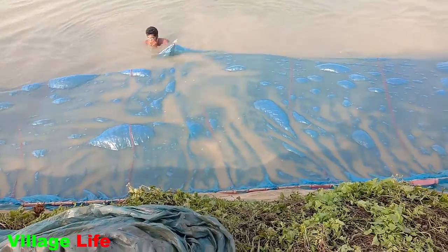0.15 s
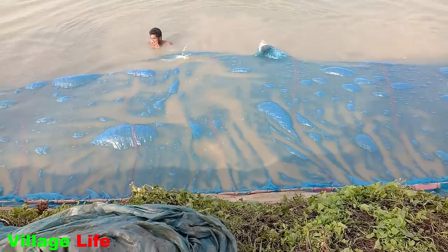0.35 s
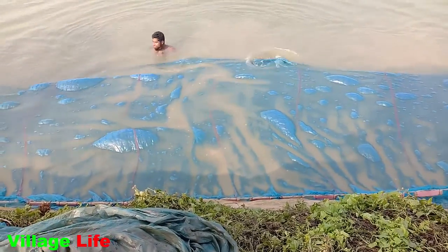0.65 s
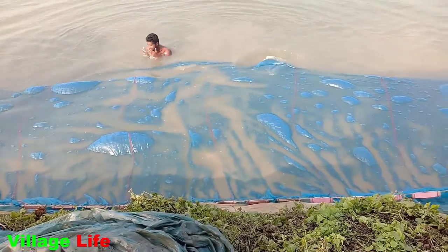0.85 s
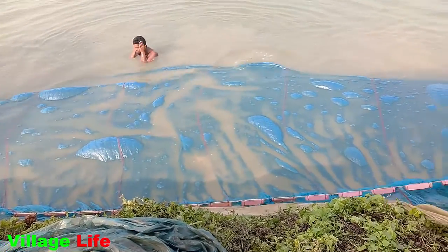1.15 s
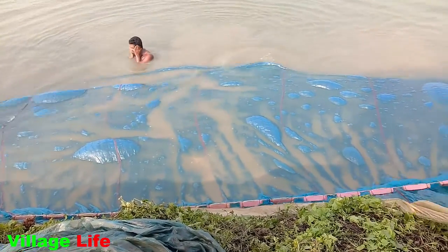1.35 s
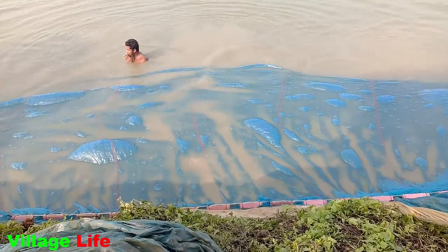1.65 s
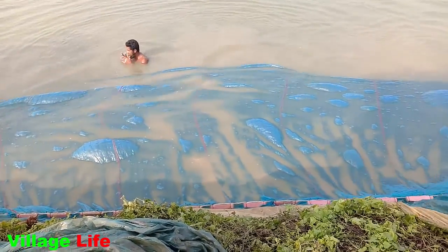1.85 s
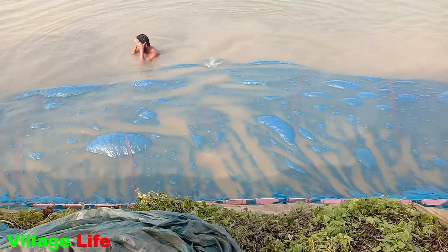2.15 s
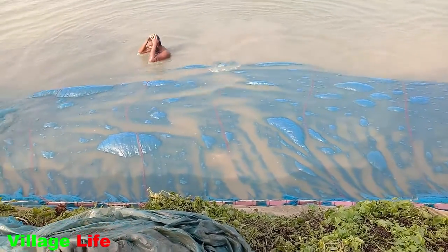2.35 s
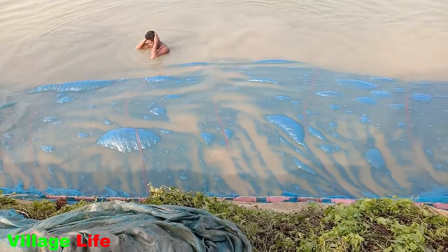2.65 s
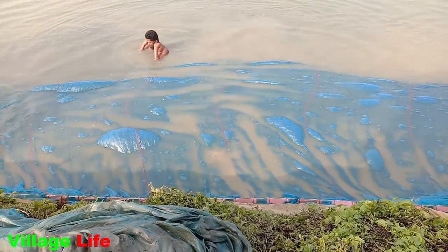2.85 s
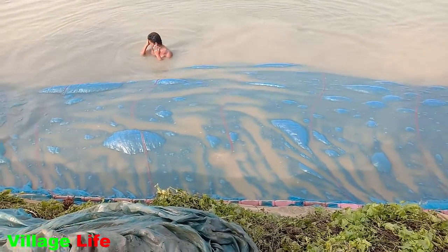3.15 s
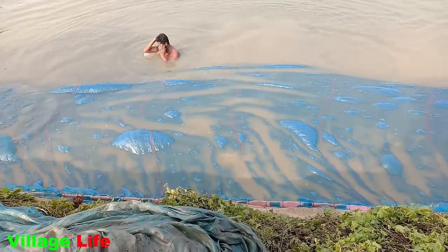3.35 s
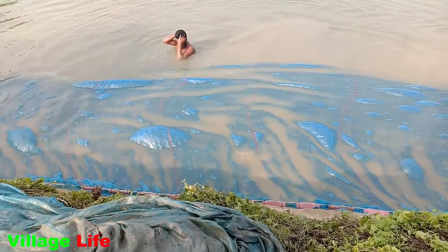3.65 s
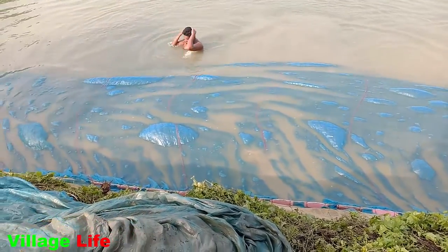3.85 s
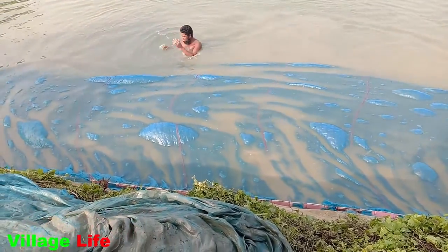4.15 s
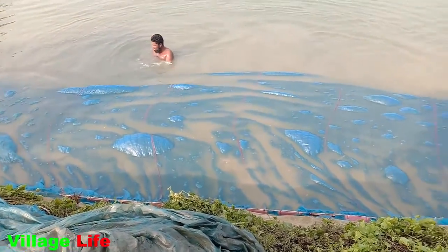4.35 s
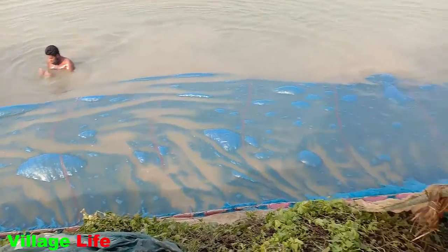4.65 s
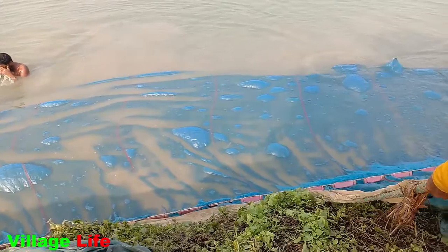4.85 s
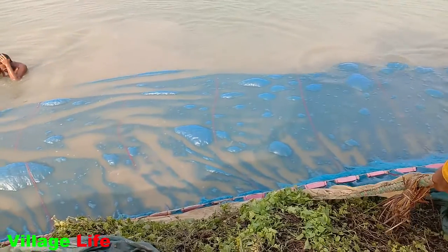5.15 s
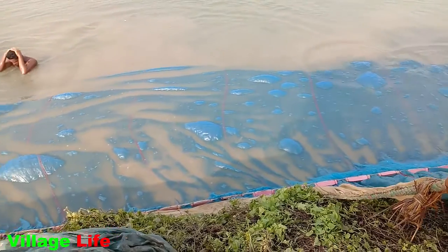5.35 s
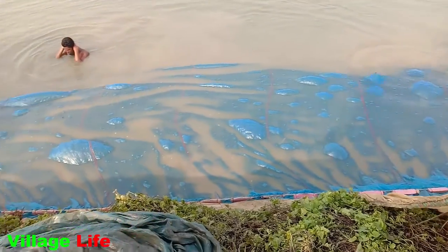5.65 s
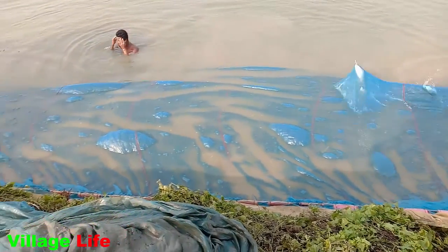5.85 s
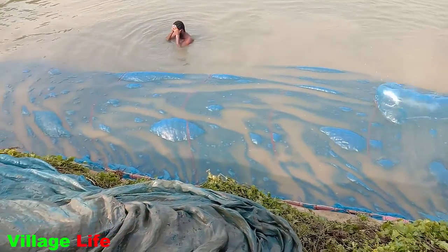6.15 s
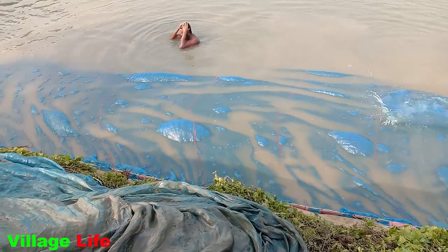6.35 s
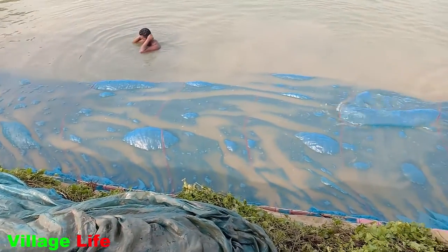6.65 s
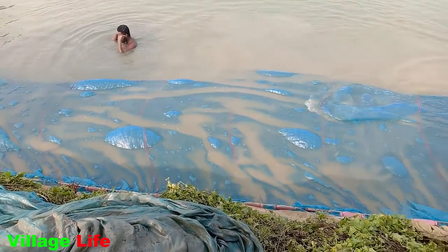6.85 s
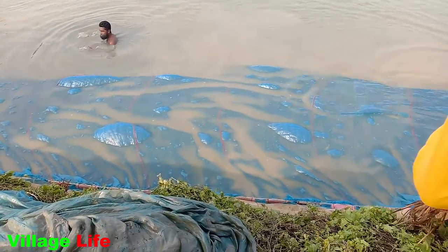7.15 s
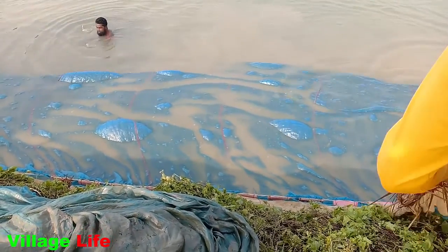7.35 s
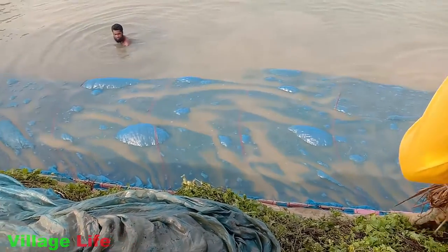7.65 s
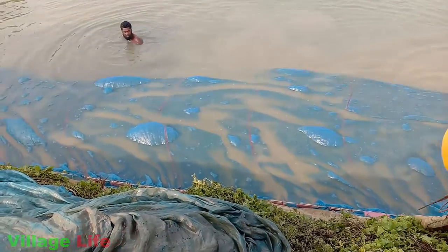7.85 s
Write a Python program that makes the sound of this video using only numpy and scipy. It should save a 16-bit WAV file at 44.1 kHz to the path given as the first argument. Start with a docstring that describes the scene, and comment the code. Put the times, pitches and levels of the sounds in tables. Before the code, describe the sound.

A wide net is drawn through muddy pond water. It begins quietly with light trickling and small bubbles, then a sharp fish splash cracks with hollow plops. Fuller surges of fizzy spray and low slosh swell and fade in succession, with more slaps and gurgles later. Faint breeze thumps and a distant low hum sit underneath. Outdoors, nearly mono, through a small microphone with a hollow midrange.

```python
"""Fishing net drawn through a pond

A wide net moves through muddy water: surges of spray are shaped noise plus swarms of damped-sine bubbles.
Fish flap in short noise bursts; air pockets plop and gurgle as damped sines with climbing pitch.
A breathy hiss, a light breeze and a far hum are coloured noise with slow or gusting gains.
A small microphone with a hollow mid resonance feeds both channels; only a faint low murmur differs.
"""
import sys
import numpy as np
from scipy import signal
from scipy.fft import rfft, irfft, next_fast_len
from scipy.io import wavfile
from scipy.ndimage import uniform_filter1d, map_coordinates

SR = 44100
rng = np.random.default_rng(int(sys.argv[2]) if len(sys.argv) > 2 else 0)


def int16_out(signal):
    """Quantize to a 16-bit WAV file."""
    q = np.round(np.clip(np.atleast_2d(signal).T, -1, 1) * 32767)
    wavfile.write(sys.argv[1], SR, q.astype(np.int16))


N = 352711


def amp(db):
    """Gain of a level in dB."""
    return 10 ** (np.asarray(db) / 20)


def unit(x):
    """x at rms 1."""
    return x / np.sqrt(np.mean(x ** 2) + 1e-20)


def wobble(rate_hz):
    """Smooth random curve, rate_hz knots a second."""
    knots = rng.standard_normal(int(N * rate_hz / SR) + 4)
    return map_coordinates(knots, [np.arange(N) * rate_hz / SR])


def filtered(x, response):
    """x times a response given as a function of frequency in Hz."""
    size = next_fast_len(N + SR // 2)
    f_hz = np.fft.rfftfreq(size, 1 / SR)
    return irfft(rfft(x, size) * response(f_hz), size)[..., :N]


def coloured(x, spectrum):
    """x through (Hz, dB) points on a log axis, closed at both ends, at rms 1."""
    f_hz, db = np.transpose(spectrum)

    def response(hz):
        return amp(np.interp(np.log(hz + 1), np.log(f_hz), db, -120, -120))

    return unit(filtered(x, response))


def noise(spectrum):
    """Steady Gaussian noise of the given spectrum, at rms 1."""
    return coloured(rng.standard_normal(N), spectrum)


def patter(spread_db, grain_s, patchy_db):
    """Countless drops: white noise with grain-by-grain random gain, patchy in time and frequency."""
    z = signal.stft(rng.standard_normal(N), nperseg=512)[2]
    field = uniform_filter1d(rng.standard_normal(z.shape), 6, axis=0)
    field = uniform_filter1d(field, 8, axis=1)
    hiss = signal.istft(z * amp(patchy_db * unit(field)), nperseg=512)[1][:N]
    grain = np.arange(N) / SR / grain_s
    size = np.interp(grain, np.arange(N), rng.standard_normal(N))
    return hiss * amp(spread_db * size)


def bubbles(start_s, db, hz, cycles, climb, size):
    """Damped sines, soft start; pitch climbs over two lives as each bubble nears the surface."""
    t = np.arange(size) / SR
    age = t * (hz / np.clip(cycles, .5, 40))[:, None]  # in lives; a life is a fall of 20 dB
    turns = hz[:, None] * t * (1 + climb[:, None] / 2 * np.minimum(age, 2))
    shape = amp(-20 * age) * (1 - np.exp(-hz[:, None] * t / 0.53))
    shape = shape / shape.max(axis=1, keepdims=True)
    tones = amp(db)[:, None] * shape * np.sin(2 * np.pi * turns)
    at = np.round(start_s * SR).astype(int)[:, None] + np.arange(size)
    return np.bincount(at.ravel(), tones.ravel(), N + size)[:N]


def swarm(hz, octaves, cycles, spread_db, count, size):
    """Bubbles at random times, with random pitch and level, at rms 1."""
    start_s = rng.random(count) * (N - 1) / SR
    pitch, level = rng.standard_normal((count, 2)).T
    pitch_hz = hz * 2 ** (octaves * pitch)
    lives, climb = np.full(count, cycles), np.full(count, .15)
    return unit(bubbles(start_s, spread_db * level, pitch_hz, lives, climb, size=size))


HOP = 64  # samples per step of the hump gains
EDGE_DROP_DB = 12  # drop below peak power one rise before and one fall after


def swells(peak_s, rise_s, fall_s, square):
    """One smooth hump of power per event, peak 1, a row each."""
    late_s = np.arange(0, N + HOP, HOP) / SR - peak_s[:, None]
    width_s = np.where(late_s < 0, rise_s[:, None], fall_s[:, None])
    return amp(-2 * EDGE_DROP_DB * np.abs(late_s / width_s) ** square)


def summed(db, humps, rest_db):
    """Gain per sample of humps over a steady rest; powers add."""
    power = amp(2 * db) @ humps + amp(2 * rest_db)
    return np.sqrt(np.interp(np.arange(N) / HOP, np.arange(len(power)), power))


# low murmur, opposite in the two channels: f/Hz, density/dB
MURMUR_BAND = [(20, 6), (100, -1), (300, -3), (700, -6), (1000, -19)]
MURMUR_DB = -86.5


def murmur():
    """Faint low noise, slowly unsteady in level."""
    return amp(MURMUR_DB + 1.7 * wobble(15)) * noise(MURMUR_BAND)


# distant countryside hum: f/Hz, density/dB
HUM_BAND = [(12, -41), (20, 3), (103, 15), (143, 20), (247, -14), (490, 7), (700, -17), (910, -28),
            (1540, -120)]
HUM_DB = -83


def far_hum():
    """Steady low noise from far off."""
    return amp(HUM_DB) * noise(HUM_BAND)


# gusts thudding on the microphone: t/s, level/dB, rise and fall/s
GUSTS = [(0.12, -53, 0.028), (0.38, -55, 0.055), (0.79, -56, .03), (0.88, -51, 0.017), (1.02, -54, 0.018),
         (1.35, -59, 0.04), (2.2, -58, .04), (2.49, -56, 0.036), (2.94, -53, 0.076), (4.34, -55, 0.044),
         (4.9, -54.5, 0.024), (5.04, -58, 0.033), (5.5, -50.5, 0.089), (5.99, -46.5, 0.035),
         (6.15, -54, .05), (6.32, -54.5, .03), (6.54, -53, 0.032), (6.95, -58, 0.11), (7.19, -57, 0.028),
         (7.67, -59, 0.028)]
# buffeting of air: f/Hz, density/dB
PUFF_BAND = [(20, -13), (45, -11), (65, -2.5), (100, 0), (150, -1), (260, -26)]
BREEZE_DB = -63.5  # between gusts, median
GUST_SQUARE = 2.2  # 2 = bell, more = flat top


def breeze():
    """Low turbulent noise at the microphone: lumpy light air plus single gusts."""
    peak_s, db, half_s = np.transpose(GUSTS)
    gusts = summed(db, swells(peak_s, half_s, half_s, GUST_SQUARE), -120)
    light_air = amp(BREEZE_DB) * amp(3.2 * wobble(12))
    return (gusts + light_air) * noise(PUFF_BAND)


# course of the breathy hiss: t/s, level/dB
WHISPER = [(0.0, -60), (0.09, -66), (0.82, -62.5), (1.31, -64), (1.51, -52.5), (1.76, -54.5), (3.54, -52.5),
           (3.78, -57), (4.32, -48), (4.88, -48.5), (5.14, -60.5), (5.41, -64), (5.59, -57.5),
           (6.39, -52.5), (7.42, -50), (7.57, -60), (7.77, -58.5), (8.0, -53.5)]
# its narrow band: f/Hz, density/dB
WHISPER_BAND = [(950, -15), (1130, -6.5), (1250, 2), (1370, -6.5), (1600, -5)]


def whisper():
    """Narrow noise, gently unsteady, that lasts through the lulls."""
    t_s, db = np.transpose(WHISPER)
    course_db = np.interp(np.arange(N) / SR, t_s, db)
    flicker_db = 2.2 * wobble(30) + 1.3 * wobble(7)
    return amp(course_db + flicker_db) * noise(WHISPER_BAND)


# drops snapping on the taut mesh: t/s, peak level/dB
TICKS = [(1.172, -31), (1.192, -24), (4.8064, -41), (5.2444, -39.5), (6.9614, -29), (7.5774, -31)]


def snaps():
    """Mesh under a drop: a short damped sine of fixed pitch."""
    start_s, db = np.transpose(TICKS)
    one = np.ones(len(start_s))
    return bubbles(start_s, db, hz=5600 * one, cycles=8.2 * one, climb=0 * one, size=300)


# single bubbles, small plops to large air pockets closing: t/s, peak level/dB, f/Hz, life/cycles
PLOPS = [(0.296, -39.5, 970, 7), (0.349, -54, 133, 5.1), (0.407, -42.5, 750, 14), (0.42, -46, 440, 8.7),
         (0.424, -45, 760, 7.6), (0.539, -46, 794, 8), (0.579, -40, 2140, 8.7), (0.605, -37, 1095, 11),
         (0.615, -46, 1230, 16), (0.657, -43, 940, 9.8), (0.672, -47, 524, 7.8), (0.798, -36, 1590, 8.7),
         (0.875, -37, 96, 2), (0.972, -50, 540, 6), (0.988, -48, 350, 5.1), (1.013, -44, 355, 6.7),
         (1.194, -28, 1540, 6.8), (1.195, -29, 2790, 7.3), (1.314, -41, 1240, 8), (1.315, -42, 800, 6.6),
         (1.357, -38, 493, 7.3), (1.36, -25.5, 1200, 7.3), (1.368, -22, 1960, 12), (1.376, -19, 1910, 10),
         (1.381, -18, 1130, 2.5), (1.386, -29.5, 705, 4.4), (1.392, -22, 1010, 13), (1.4, -14, 1830, 4.6),
         (1.429, -41, 300, 5.2), (1.448, -41, 380, 6.6), (1.488, -45, 376, 6), (1.596, -36.5, 1240, 8),
         (1.689, -30.5, 1220, 11), (1.69, -28, 290, 2.8), (1.891, -35, 1225, 29), (2.888, -43, 387, 11),
         (3.33, -40, 490, 8.5), (3.723, -33, 960, 9.9), (4.268, -25.5, 1170, 5.9), (4.277, -23, 2200, 8.7),
         (4.359, -36, 390, 5.3), (4.392, -28.5, 360, 13.5), (4.394, -26, 1170, 3.9),
         (4.428, -31.5, 377, 6.7), (4.431, -25, 1420, 27), (4.457, -37, 222, 5.2), (4.81, -32.5, 1370, 8),
         (5.226, -41, 1640, 9), (5.246, -37, 1890, 7.8), (5.76, -24, 932, 15), (5.779, -32, 875, 8.2),
         (5.795, -36, 810, 8), (5.808, -36, 840, 11), (5.982, -32.5, 250, 3.5), (6.097, -36, 800, 8),
         (6.125, -33.5, 322, 3.2), (6.157, -38.5, 2200, 8), (6.234, -29.5, 1230, 10),
         (6.238, -33, 2600, 12), (6.856, -33, 253, 10), (6.908, -38, 320, 4.5), (6.935, -40, 420, 6),
         (6.889, -37, 575, 6.9), (6.956, -27, 337, 3.7), (6.962, -15.5, 1190, 4.2), (6.968, -36.5, 170, 4),
         (6.984, -32, 465, 4.7), (7.01, -35, 468, 6), (7.022, -43, 165, 3.9), (7.03, -38, 397, 8.8),
         (7.049, -35, 350, 15), (7.09, -39.5, 390, 10), (7.149, -37, 290, 4.1), (7.172, -38, 190, 3.5),
         (7.285, -44, 198, 2.9), (7.291, -42, 482, 4.7)]
PLOP_CLIMB = 0.077  # fraction of pitch per life


def plops():
    """Bubbles and air pockets standing out alone, each ringing at its own pitch."""
    start_s, db, hz, cycles = np.transpose(PLOPS)
    return bubbles(start_s, db, hz, cycles, np.full(len(PLOPS), PLOP_CLIMB), size=5000)


# water surging off the mesh: peak t/s, fizz level/dB, rise/s, fall/s, squareness (2 = bell, more = flat top),
# coarse drops/dB over fizz, brightness/dB, slosh level/dB, deep slosh level/dB
SURGES = [(0.18, -48, .11, .05, 2.4, -15, 2, -83, -73), (0.41, -54, 0.16, 0.46, 2.4, -7.5, 5, -72, -72),
          (0.51, -44, 0.028, .04, 2.4, -11, 2, -60, -69), (0.8, -42, .24, 0.24, 2.2, -11.5, 5.5, -58, -68),
          (0.93, -39.5, .048, 0.35, 2.3, -16.5, 3, -60.5, -67),
          (1.32, -45.5, 0.025, 0.34, 3.4, -4, -3, -60, -70),
          (1.53, -44, .036, 0.34, 2.4, -10.5, -3, -72, -66),
          (1.83, -43.5, 0.048, .48, 2.7, -16, -6, -78, -73),
          (2.11, -32.5, .11, .2, 2, -14.5, 0, -53.5, -57),
          (2.56, -27, .17, 0.18, 3.2, -18.5, 2, -51.5, -55),
          (2.98, -30.5, 0.19, 0.24, 2.07, -16, -0.5, -49, -57),
          (3.32, -40, 0.072, 0.16, 2.8, -8.5, 1.5, -51, -57),
          (3.519, -28.5, 0.17, 0.12, 2.24, -19, -0.5, -50, -58.5),
          (3.83, -40.5, 0.32, .087, 2.4, -11, 2, -58, -65),
          (4.13, -31.5, .29, .31, 2.3, -13.5, -2, -52, -65),
          (4.42, -29, 0.097, 0.25, 2.35, -16.5, -3, -47.5, -56.5),
          (4.95, -37, 0.37, .16, 2.1, -8, -5.5, -52, -65), (5.17, -45, 0.047, .1, 2.4, -10.5, -5, -57, -69),
          (5.43, -39, 0.053, 0.25, 2.06, -14, 0, -52.5, -49.5),
          (5.7, -43.5, 0.059, 0.62, 3.2, -13, -3.5, -56.5, -58.5),
          (5.98, -32, .13, 0.16, 1.7, -9, -0.6, -47.5, -51),
          (6.38, -41.5, 0.44, 0.038, 2.2, -5.5, 2.5, -50.5, -59),
          (6.51, -34, 0.29, 0.28, 2.55, -7, -1, -53, -63),
          (6.92, -32, .19, .27, 2.6, -11.5, -1.5, -46, -53),
          (7.22, -40.5, 0.047, 0.28, 2.9, -8.5, 0, -55.5, -66),
          (7.43, -37.5, 0.17, .24, 1.7, -12, -4, -54, -61.5), (7.9, -41, 0.11, .25, 2, -15, -6, -64, -67)]
# steady flow between surges: fizz level/dB, coarse drops/dB over fizz, brightness/dB,
# slosh level/dB, deep slosh level/dB
TRICKLE = (-51.5, -21, 2.5, -67.5, -75)
MIST_DB, MIST_PER_BRIGHT = -14.5, 0.24  # mist over fizz at brightness 0; dB per dB of brightness


def blend(fizz_db, coarse_db, bright_db, slosh_db, deep_db):
    """Levels in dB of low fizz, high fizz, mist, coarse drops, slosh and deep slosh."""
    mist_db = fizz_db + MIST_DB + MIST_PER_BRIGHT * bright_db
    low_db, high_db = fizz_db - bright_db / 2, fizz_db + bright_db / 2
    return [low_db, high_db, mist_db, fizz_db + coarse_db, slosh_db, deep_db]


def surges():
    """Gains of the six layers of blend: each surge swells them together in its own mix."""
    peak_s, fizz_db, rise_s, fall_s, square, *colour = np.transpose(SURGES)
    humps = swells(peak_s, rise_s, fall_s, square[:, None])
    levels = zip(blend(fizz_db, *colour), blend(*TRICKLE))
    return [summed(db, humps, rest_db) for db, rest_db in levels]


# turbulent water: f/Hz, density/dB
BODY_BAND = [(90, -22), (170, -4.5), (300, -1.5), (500, 6), (800, 0.5), (1300, -23)]


def slosh():
    """Low turbulence and gurgling air pockets, in lumps; the deep part has its own weight."""
    pockets = swarm(hz=380, octaves=.45, cycles=7.5, spread_db=2.2, count=900, size=1800)
    water = coloured(patter(spread_db=2.5, grain_s=0.008, patchy_db=1.5), BODY_BAND)
    churn = water + amp(-6) * pockets
    deep = filtered(churn, lambda hz: 1 / (1 + (hz / 290) ** 8))
    middle_gain, deep_gain = surges()[-2:]
    middle = unit((churn - deep) * amp(2.34 * wobble(11)))
    bottom = unit(deep * amp(2.8 * wobble(9)))
    return middle_gain * middle + deep_gain * bottom


# fish flaps at the surface, and at 7.576 s the broadband crack of a drop snapping on the mesh: t/s, peak
# level/dB, rise/s, t60/s, coarse drops/dB over fizz, mist/dB over fizz
SPLASHES = [(0.408, -41.5, 0.0024, 0.06, -10, -18), (1.192, -51, 0.0027, 0.064, -15, -14),
            (1.377, -29, .003, 0.069, -2, -18), (1.399, -18, 0.003, 0.077, -11, -13.5),
            (1.675, -20.5, 0.011, 0.14, -17, -15.5), (1.82, -37, 0.004, 0.033, -22, -28),
            (1.889, -37, 0.0043, 0.06, -11, -16), (4.2744, -39, .003, 0.03, -12, -22),
            (5.69, -43, 0.0052, 0.072, -23, -11), (5.7623, -39, .004, 0.059, -18, -14),
            (6.1544, -20.5, 0.0012, 0.05, -16, -12.5), (6.231, -22.5, .0015, 0.045, -22, -13),
            (6.2954, -46, 0.0037, 0.049, -10, -20), (6.9644, -41, .003, 0.055, 4, -16),
            (7.576, -31.5, 0.00089, 0.0098, -20, -22)]
SPLASH_HOLD_S = 0.013


def splashes():
    """Gains of fizz, coarse drops and mist in sudden bursts: rise, hold, exponential decay."""
    t = np.arange(SR // 2) / SR
    gains = np.zeros((3, N + SR))
    for start_s, peak_db, rise_s, t60_s, coarse_db, mist_db in SPLASHES:
        rms_db = peak_db - 10  # noise peaks taken as 10 dB over rms
        decay_s = np.clip(t - rise_s - SPLASH_HOLD_S, 0, 1)
        burst = amp(rms_db - 60 * decay_s / max(t60_s, .005))
        burst = burst * np.clip(t / max(rise_s, .001), 0, 1)
        at = round(start_s * SR)
        gains[:, at:at + len(t)] += amp([[0], [coarse_db], [mist_db]]) * burst
    return gains[:, :N]


def pops():
    """Tiny bubbles bursting in the foam, each a chirp that mostly dies within a millisecond."""
    return swarm(hz=5500, octaves=.35, cycles=3.5, spread_db=3.5, count=12000, size=100)


# spray layers, each: f/Hz, density/dB
FIZZ_BAND = [(900, -36), (1700, -6.5), (2400, -1.5), (4300, -3.5), (5200, -1.5), (6200, 1.5), (6700, -5),
             (7200, -1), (8300, -17), (10000, -25.5)]
DROPS_BAND = [(400, -11), (750, -2.5), (1000, 3), (1500, -2.5), (2200, -3.5)]
MIST_BAND = [(7000, -16), (8500, -6), (11400, -2.5), (11900, -9.5), (14200, -7.5), (14900, 0),
             (16000, -3.5)]
SPLASH_BRIGHT_DB = -5  # fizz above the split against fizz below


def spray():
    """Surges and fish splashes share fizz, mist and coarse drops; the drops carry small bubbles."""
    low, high, fine, coarse = surges()[:4] * amp(0.37 * wobble(16))
    flap, flap_coarse, flap_fine = splashes()

    water = patter(spread_db=1.0, grain_s=0.0013, patchy_db=0.98) + amp(-13.5) * pops()
    fizz = coloured(water, FIZZ_BAND)
    upper = filtered(fizz, lambda hz: hz ** 4 / (hz ** 4 + 4200 ** 4))
    lower = fizz - upper
    tilt = amp(SPLASH_BRIGHT_DB / 2)
    fizz = upper * (high + flap * tilt) + lower * (low + flap / tilt)
    mist = coloured(water, MIST_BAND) * (fine + flap_fine)

    small = swarm(hz=1313, octaves=0.513, cycles=4.8, spread_db=1.5, count=2500, size=500)
    drops = coloured(patter(spread_db=2.0, grain_s=0.0055, patchy_db=5.0), DROPS_BAND)
    drops = drops + amp(-3) * small
    flap_drops = filtered(drops, lambda hz: 1 / (1 + (800 / (hz + 1)) ** 4))  # splashes drop the lows
    return fizz + mist + coarse * unit(drops) + flap_coarse * unit(flap_drops)


def scene():
    """All sources in one signal; the murmur enters the two channels with opposite sign."""
    mono = far_hum() + breeze() + whisper() + snaps() + plops() + slosh() + spray()
    apart = murmur()
    return np.array([mono + apart, mono - apart])


HOLLOW_HZ, HOLLOW_WIDTH_HZ, HOLLOW_DB = 1250, 110, -1  # level of the ring added to the direct sound
TOP_HZ = 15750


def record(dry):
    """Microphone: the housing's mid resonance adds to the direct sound, with a hard band limit."""
    def response(hz):
        ring = 1j * hz * HOLLOW_WIDTH_HZ
        resonance = ring / (HOLLOW_HZ ** 2 - hz ** 2 + ring)
        return (1 + amp(HOLLOW_DB) * resonance) * (hz < TOP_HZ)

    return filtered(dry, response)


dry = scene()
out = record(dry)
int16_out(out)
```